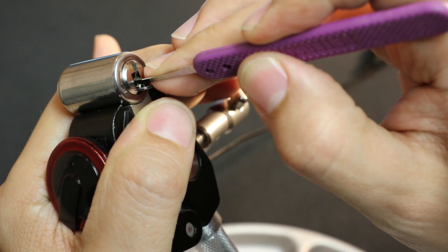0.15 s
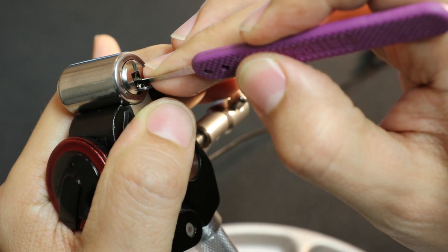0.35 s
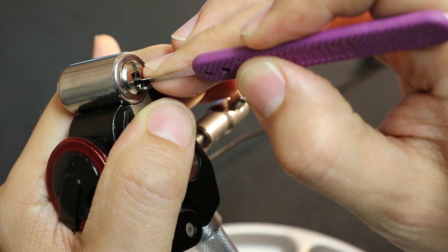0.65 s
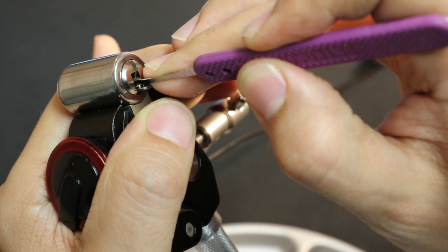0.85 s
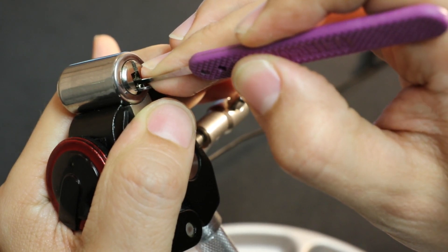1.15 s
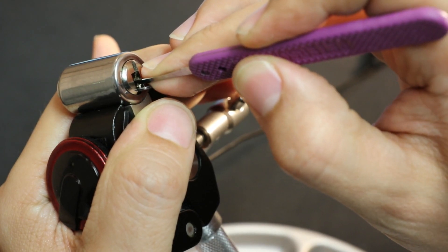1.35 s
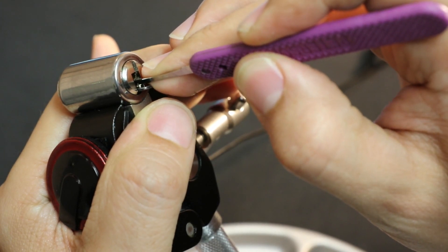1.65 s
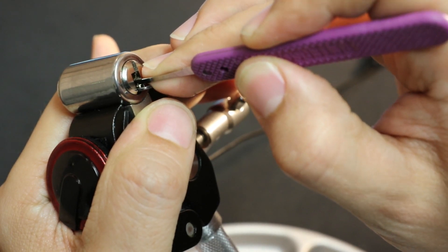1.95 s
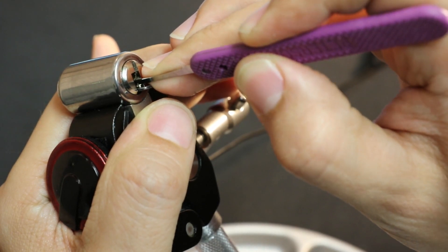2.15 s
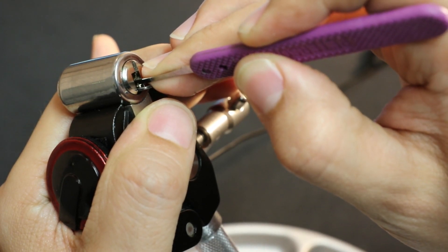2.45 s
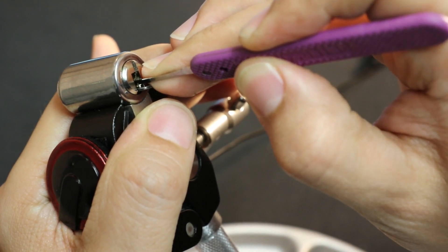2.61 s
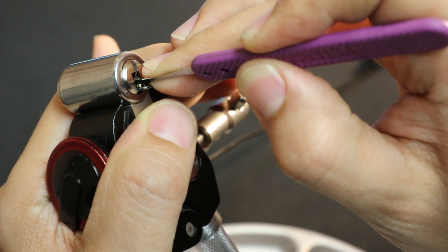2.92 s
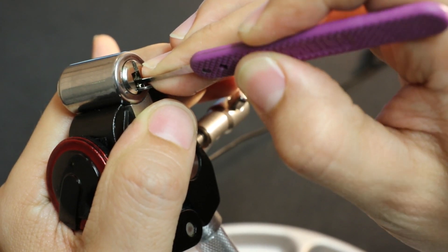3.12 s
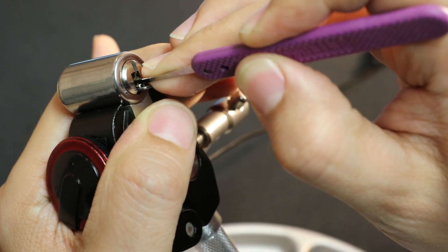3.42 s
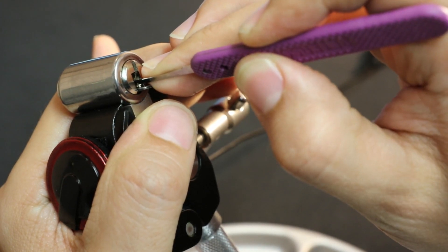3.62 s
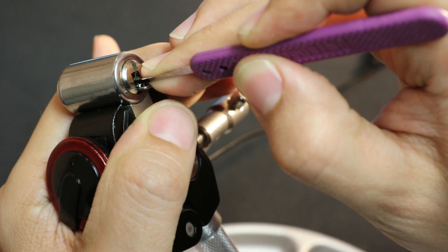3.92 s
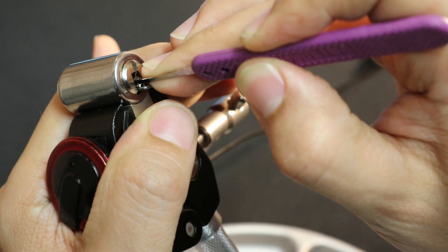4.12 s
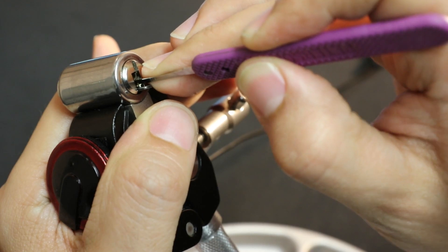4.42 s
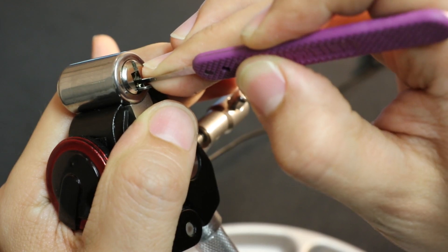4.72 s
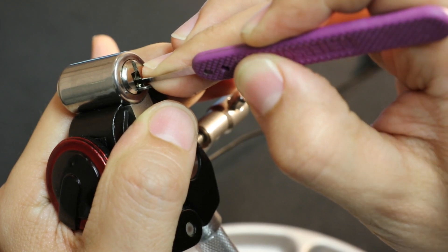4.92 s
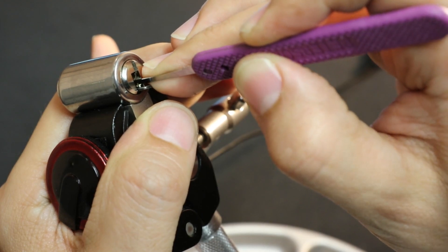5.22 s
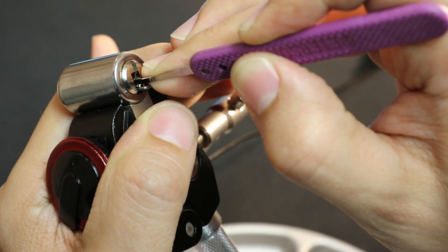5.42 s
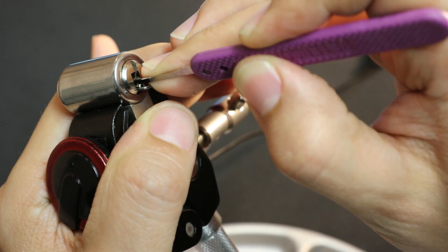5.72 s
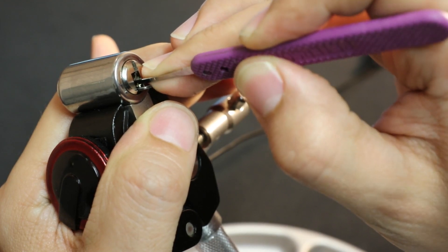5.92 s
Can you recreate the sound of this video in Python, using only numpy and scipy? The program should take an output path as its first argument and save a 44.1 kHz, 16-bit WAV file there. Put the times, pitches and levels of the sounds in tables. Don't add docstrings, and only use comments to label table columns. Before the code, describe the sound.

A quiet room with steady low mains hum, leaning left, soft rumble and thin hiss. Close up, a metal pick works in a small lock. A faint scrape and bump open it, then a dull, woody-metallic knock at 0.3 s and a firmer click at 0.9 s with a short rattle. Very faint nudges and a tick follow around 1.3 to 1.9 s. At 2.2 s a quick double click rattles brightly; at 2.85 s comes a small ringing tick. From 3.1 to 4.2 s there are light scrapes and a cluster of soft ticks, with barely audible far thuds. Small scrapes and a dull tap come near 4.5 s, then a loud hard snap with bright rattle at 4.75 s. Soft ticks follow at 5.0, 5.15 and 5.5 s. The loudest crack hits at 5.75 s, its rattle spreading wide and dying quickly into hum.

```python
import sys
import numpy as np
from scipy import signal
from scipy.fft import rfft, irfft, next_fast_len
from scipy.io import wavfile

SR = 44100
rng = np.random.default_rng(int(sys.argv[2]) if len(sys.argv) > 2 else 0)


def wrap_up_sound(samples):
    columns = np.atleast_2d(samples).T
    tamed = np.clip(columns, -1, 1)
    steps = np.round(tamed * 32767).astype(np.int16)
    wavfile.write(sys.argv[1], SR, steps)


def elevation(decibels):
    levels = np.asarray(decibels, float)
    return 10 ** (levels / 20)


N = 267025
T = np.arange(N) / SR

# pitch in Hz, level in dB, time to fade by 60 dB in seconds.
MAIN_MODES = [(1330, -8.5, 0.06), (1563, 3, .032), (1950, -7.5, 0.01)]
LOW_MODES = [(1042, -4, .035), (1153, -12, 0.06), (1230, -12, 0.057)]
LONG_MODES = [(600, -18, 0.012), (756, -24.5, 0.12), (890, -18.5, 0.0044), (1320, -32.5, 0.24)]
TABLE_MODES = [(192, -42.5, 0.87), (222, -36, 0.27), (330, -26, 0.036), (420, -25.5, 0.0081),
               (480, -39.5, 0.014)]

# start of the slip in seconds, peak level in dB, low
# shell ring in dB, treble slope in dB per octave, pin ring in dB.
RATTLES = [
    (0.272, -57.5, 6.5, -12, 0),
    (0.9135, -53, 12.5, -3, 3),
    (1.334, -65, 5, -2, -2),
    (2.2328, -53.5, 2, 8, -.6),
    (2.852, -52, -4, 7, 5),
    (3.497, -67.5, 11, -4, -5),
    (4.559, -61, -2, -10, 10.5),
    (4.7441, -36, 7, 4, 2.5),
    (5.7416, -20.5, -5, 3, -3.5),
]


def at_hz(points, hz):
    points = np.array(points)
    return np.interp(np.log(hz), np.log(points[:, 0]), points[:, 1])


def clicks(seconds, sizes):
    out = np.full(N, 1e-18)
    places = np.round(np.asarray(seconds) * SR).astype(int).clip(0, N - 1)
    np.add.at(out, places, sizes)
    return out


def ring(x, hz, t60):
    r = elevation(-60 / (t60 * SR))
    w = 2 * np.pi * hz / SR
    return signal.lfilter([0, np.sin(w)], [1, -2 * r * np.cos(w), r * r], x)


def resonance(x, hz, width):
    r = np.exp(-np.pi * width / SR)
    edge = (1 - r * r) / 2
    return signal.lfilter([edge, 0, -edge], [1, -2 * r * np.cos(2 * np.pi * hz / SR), r * r], x)


def soften(x, hz):
    r = np.exp(-2 * np.pi * hz / SR)
    return signal.lfilter([(1 - r) ** 2], [1, -2 * r, r * r], x)


def band(x, low_hz, high_hz, order=2):
    return signal.sosfilt(signal.butter(order, [low_hz, high_hz], "band", fs=SR, output="sos"), x)


def lean(db):
    return elevation(db * np.array([[0.5], [-0.5]]))


def struck(modes, seconds, db, spread_db):
    luck = rng.standard_normal((len(seconds), len(modes)))
    out = np.zeros(N)
    for k, (hz, level_db, t60) in enumerate(modes):
        blows = clicks(seconds, elevation(db + level_db + spread_db * luck[:, k]))
        out += (-1) ** k * ring(blows, hz, t60)
    return out


def dragged(modes, push):
    return sum(elevation(db) * ring(push, hz, t60) for hz, db, t60 in modes)


def soft_blow(s, db, hz, t60, lean_db):
    blow = clicks([s], elevation(db + 13.0))
    return soften(ring(blow, hz, t60), 0.51 * hz) * lean(lean_db)


def rumble_and_hiss():
    # frequency in Hz, level in dB per Hz.
    noise_colour = [(14, 1.5), (38, -9), (62, -20.5), (110, -19.5), (450, -30), (1600, -39.5), (6000, -45),
                    (16500, -45)]
    # frequency in Hz, likeness from 0 to 1.
    side_likeness = [(20, 1), (130, 0.93), (300, 0.028), (5000, .03), (6500, 0.093), (7800, .93)]
    size = next_fast_len(N)
    hz = np.maximum(np.arange(size // 2 + 1) * SR / size, 1)
    mid, side = rfft(rng.standard_normal((2, size))) * elevation(at_hz(noise_colour, hz))
    alike = np.clip(at_hz(side_likeness, hz), 0, 1)
    spectrum = np.sqrt(1 + alike) * mid + np.sqrt(1 - alike) * side * [[1], [-1]]
    out = irfft(spectrum, size)[:, :N]
    return elevation(-57.5) * out / out.std()


def hum():
    # pitch in Hz, left level in dB, right level in dB, left's lead in radians.
    hum_tones = [(59.3, -84, -71, -1.1), (60, -53, -60, 1.8), (103.5, -80, -76, 2.5), (120, -70, -66, -.2),
                 (165.6, -77, -83, 2.1), (177.7, -80, -89, 3.1), (180, -80, -75, -.9),
                 (237, -84, -91, -2.2), (240, -84, -100, .2), (420, -87, -91, -.5)]
    out = np.zeros((2, N))
    starts = rng.uniform(0, 2 * np.pi, len(hum_tones))
    for (hz, left_db, right_db, lead), start in zip(hum_tones, starts):
        phase = 2 * np.pi * hz * T + start + np.array([[lead], [0]])
        out += elevation([[left_db], [right_db]]) * np.cos(phase)
    return out


def far_thuds():
    # start in seconds, level in dB, pitch in Hz, left-right difference in dB.
    thud_list = [
        (2.418, -58, 125.4, -1),
        (2.509, -48.5, 91.8, -5),
        (3.799, -64, 35, 4),
        (3.922, -52.5, 96, -4),
        (3.942, -56.5, 126, -4),
        (4.06, -69, 99, 2),
        (4.482, -57, 50.3, 14),
        (4.74, -63, 95, 9),
        (5.741, -55.5, 50.5, -9),
    ]
    swings = 45.0
    return sum(soft_blow(s, db, hz, min(swings / hz, 0.6), lean_db) for s, db, hz, lean_db in thud_list)


def bumps():
    # start in seconds, level in dB, pitch in Hz, time to fade by 60 dB in seconds.
    bump_list = [(.019, -58, 420, 0.067), (.020, -49.5, 776, 0.018), (0.273, -49.5, 330, 0.068),
                 (0.277, -50.5, 756, 0.18), (.916, -57.5, 756, 0.2), (1.351, -67, 490, 0.066),
                 (2.106, -62, 504, 0.036), (3.19, -68, 480, 0.24), (3.509, -60.5, 523, 0.05),
                 (4.49, -61, 233, 0.2), (4.495, -56, 756, 0.14), (4.745, -49, 482, 0.29)]
    return sum(soft_blow(s, db, hz, t60, -2) for s, db, hz, t60 in bump_list)


def scrapes():
    # start in seconds, length in seconds, level in dB.
    strokes = [(.0, 0.089, -67.5), (0.242, 0.028, -74), (0.73, 0.045, -73), (0.891, 0.063, -62.5),
               (1.056, 0.16, -79.5), (1.52, 0.037, -80), (3.122, 0.025, -75), (3.173, 0.05, -67.5),
               (3.262, .02, -78), (4.482, 0.033, -61.5), (4.548, 0.012, -62), (4.541, 0.088, -77),
               (4.89, 0.056, -79.5), (5.271, 0.047, -73.5), (5.369, 0.027, -76), (5.93, 0.024, -71.5)]
    low_db = 16.5
    catches_per_s = 2600
    grit = (rng.random(N) < catches_per_s / SR) * rng.uniform(-0.85, 1, N)
    pressure = np.zeros(N)
    for s, length, db in strokes:
        pressure += elevation(db) * np.sin(np.pi * np.clip((T - s) / length, 0, 1)) ** 0.42
    push = grit * pressure
    low_push = push * elevation(low_db)
    body = dragged(MAIN_MODES, push) + dragged(LOW_MODES + LONG_MODES, low_push)
    return 0.17 * body + 0.18 * dragged(TABLE_MODES, low_push)


def ticks():
    # start in seconds, peak level in dB, pitch in Hz.
    touches = [(1.463, -60, 1196), (1.869, -70, 1200), (2.344, -50.5, 1190), (2.8533, -38.5, 1070),
               (3.475, -60, 1130), (3.659, -64, 1017), (3.719, -66, 1310), (3.793, -55, 1160),
               (3.948, -51, 1160), (3.994, -56, 1170), (4.105, -55.5, 1190), (4.179, -62, 1210),
               (4.47, -73, 920), (4.597, -61, 1000), (5.015, -54, 1200), (5.144, -52, 1182),
               (5.492, -59, 1192)]
    rung = sum(ring(clicks([s - 0.002], elevation(db + 5.5)), hz, 0.048) for s, db, hz in touches)
    return band(soften(rung, 657), 680, 1600)


def rattles():
    # pitch in Hz, width in Hz, level in dB.
    shell_bands = [(1460, 630, -1.5), (2623, 410, -3), (2600, 380, 0.5), (3070, 430, -1), (3730, 260, 1.5),
                   (3880, 480, 2), (4600, 600, -5.5), (5800, 1100, -6.5), (7000, 630, -4.5),
                   (9600, 2600, -6.5), (12000, 6000, -6.5), (14660, 1800, -10.5)]
    # frequency in Hz, time to fade by 60 dB in seconds.
    room_fade = [(1500, 0.2), (3000, 0.15), (7400, 0.15), (14000, .1)]
    # frequency in Hz, likeness from 0 to 1.
    rattle_likeness = [(1500, 0.95), (3000, 0.63), (8000, 0.36)]
    # frequency in Hz, left-right difference in dB.
    rattle_lean = [(1500, 4.5), (3000, -6), (8000, -2), (15000, -5.5)]
    lag_s, burst_s = 0.019, 0.0135
    shared, own = rng.standard_normal((2, N)), rng.standard_normal((2, 2, N))
    grain = elevation(1.3 * soften(rng.standard_normal(N), 500) * np.sqrt(SR / 800))
    out = 0
    for k, (hz, width, level_db) in enumerate(shell_bands):
        power = np.zeros(N)
        octaves = np.log2(hz / 4100)
        low_bump = np.exp(-(np.log2(hz / 2650) / 0.12) ** 2)
        pin_bump = np.exp(-(octaves / 0.14) ** 2)
        for s, db, low_db, treble_db, pin_db in RATTLES:
            i = int((s + lag_s - 0.0008) * SR)
            age = T[:min(SR // 2, N - i)]
            burst = np.exp(-(age / burst_s) ** 2) * grain[i:i + len(age)]
            burst = burst + 0.9 * np.exp(-age / 0.0015)
            tail = elevation(-9 - 60 * age / at_hz(room_fade, hz)) * (1 - np.exp(-age / 0.0045))
            colour_db = treble_db * max(octaves, 0) + low_db * low_bump + pin_db * pin_bump
            colour = elevation(db + level_db + colour_db)
            onset = np.minimum(age / 0.00011, 1)
            power[i:i + len(age)] += colour ** 2 * (burst ** 2 + tail ** 2) * onset
        alike = np.clip(at_hz(rattle_likeness, hz), 0, 1)
        noise = np.sqrt(alike) * shared[k % 2] + np.sqrt(1 - alike) * own[k % 2]
        rung = resonance(noise * np.sqrt(power + 1e-30), hz, 1.8 * width)
        rung = resonance(rung, hz, 1.8 * width)
        out = out + rung * np.sqrt(SR / width) * lean(at_hz(rattle_lean, hz))
    return elevation(-23.5) * out


def slips():
    # start in seconds, peak level in dB, low modes in dB, hardness in dB, table in dB.
    slip_list = [(0.021, -62, -11, 24, 13), (.270, -35, 2.5, -3, 16.5), (.277, -50.5, 18, 13, 19),
                 (.914, -31.5, -1, 5, -11), (2.220, -39, -4, -11, -12), (2.233, -38.5, -2, 9.5, -16),
                 (2.852, -53, 10, 25, 10), (4.488, -62, 18.5, 10, 0), (4.557, -49, 2.5, 17, 14),
                 (4.744, -17, -6.5, 3, 2), (5.7411, -7.5, -7, 6, -10.5)]
    # start in seconds, peak level in dB.
    nudge_list = [
        (1.307, -66),
        (1.351, -63),
        (2.106, -60.5),
        (2.354, -71),
        (3.509, -66),
        (5.949, -68),
    ]
    # pitch in Hz, level in dB, time to fade by 60 dB in seconds.
    crack_modes = [(2030, -31.5, 0.007), (2500, -23, 0.0062), (2890, -21.5, .008), (3500, -26, 0.011),
                   (4090, -24, 0.0098), (4664, -27.5, .007), (5800, -36, 0.0044), (6700, -30, 0.0075),
                   (8050, -33.5, 0.015), (9300, -43, 0.0033)]
    nudges = [(s, db, -3, 10, 0.6) for s, db in nudge_list]
    s, db, low_db, hard_db, table_db = np.transpose(slip_list + nudges)
    long_db = -1.5 + 0.6 * hard_db
    rattle_s, _, _, treble_db, pin_db = np.transpose(RATTLES)
    top_db = 0.87 * np.interp(s, rattle_s, treble_db) - 3.5
    blow, touch = s - 0.0004, s - 0.0007

    knock = struck(MAIN_MODES, blow, db - 5.0, 0.99)
    knock += struck(LOW_MODES, blow, db + low_db - 0.6, 1.0)
    knock += struck(LONG_MODES, blow, db + long_db, 1.0)
    knock = band(knock, 500, 2800)
    knock += band(struck(TABLE_MODES, blow, db + table_db, 1.2), 180, 800)

    crack_db = db + hard_db
    contact = clicks(touch, elevation(crack_db))
    bright_contact = clicks(touch, elevation(crack_db + top_db))
    lower_modes = [m for m in crack_modes if m[0] < 5000]
    top_modes = [m for m in crack_modes if m[0] >= 5000]
    crack = struck(lower_modes, touch, crack_db + 2.0, 2.5)
    crack += struck(top_modes, touch, crack_db + top_db + 2.5, 2.9)
    pin = clicks(touch, elevation(crack_db - 36.5 + 0.8 * np.interp(s, rattle_s, pin_db)))
    crack += ring(pin, 4150, 0.035)
    grind = rng.standard_normal(N)
    spit = soften(contact, 250) * grind
    sharp = soften(bright_contact, 300) * grind
    crack += elevation(10) * band(spit, 2100, 5300, order=3)
    crack += elevation(5.0) * band(sharp, 5700, 10950, order=3)
    fizz = soften(contact, 28) * rng.standard_normal(N)
    crack += elevation(19.5) * band(fizz, 2300, 4200, order=3)
    return knock + band(crack, 1800, 11500, order=3)


def scene():
    background = rumble_and_hiss() + hum() + far_thuds() + bumps()
    return background + scrapes() + ticks() + rattles() + slips()


def low_pass(x):
    return signal.sosfilt(signal.butter(12, 16400, fs=SR, output="sos"), x)


def record(dry):
    mix = signal.sosfilt(signal.cheby2(12, 60, 16700, fs=SR, output="sos"), dry)
    return low_pass(mix)


dry = scene()
out = record(dry)
wrap_up_sound(out)
```